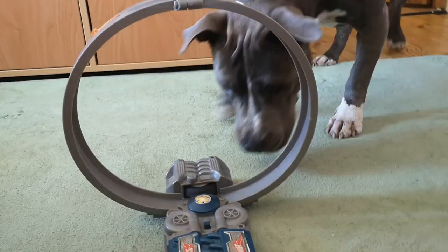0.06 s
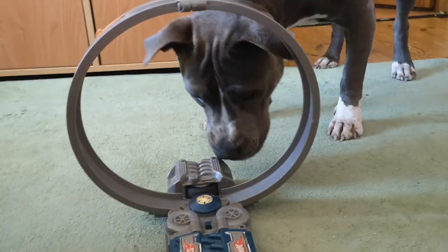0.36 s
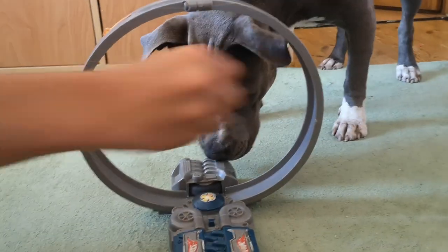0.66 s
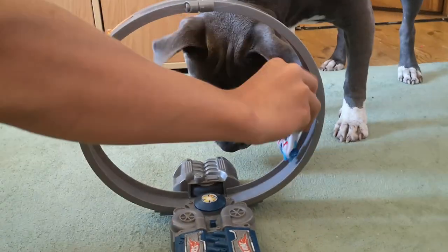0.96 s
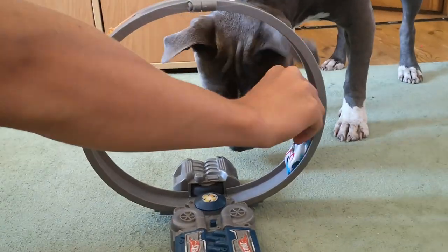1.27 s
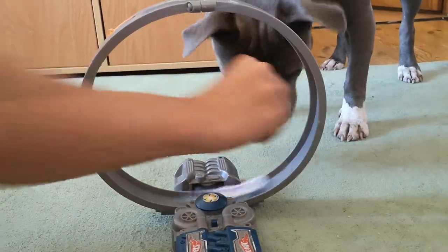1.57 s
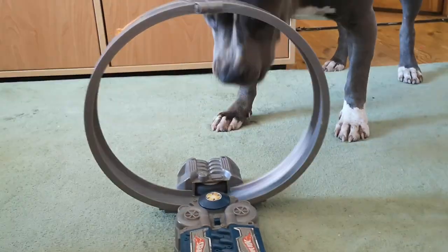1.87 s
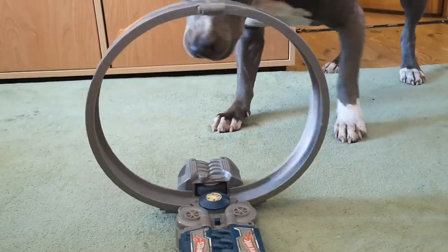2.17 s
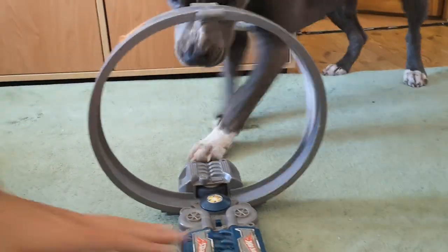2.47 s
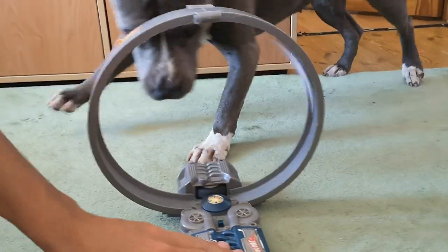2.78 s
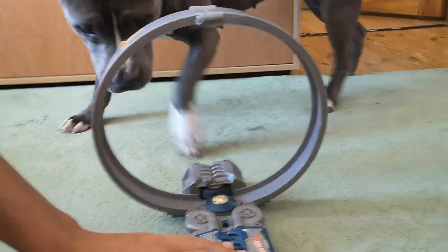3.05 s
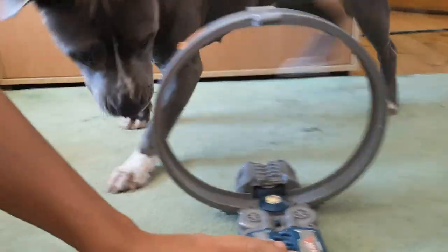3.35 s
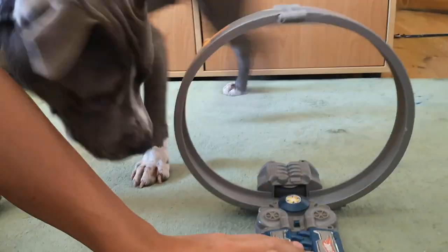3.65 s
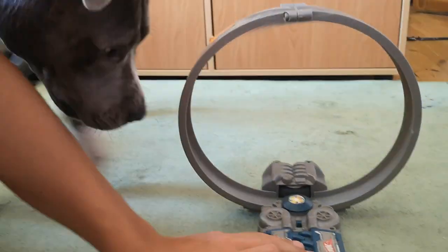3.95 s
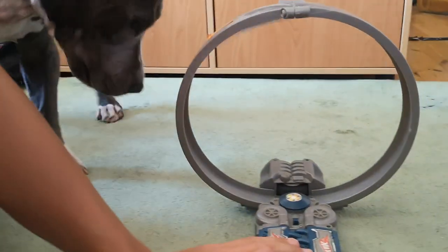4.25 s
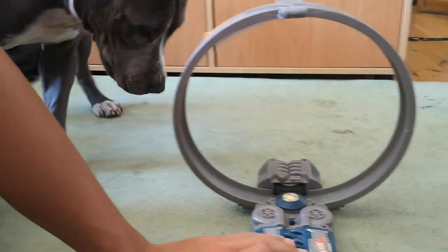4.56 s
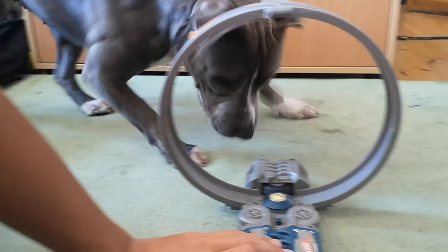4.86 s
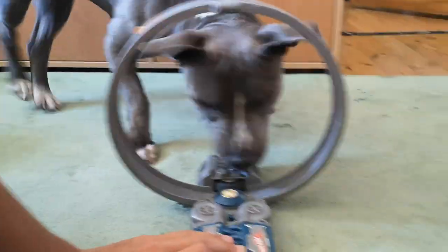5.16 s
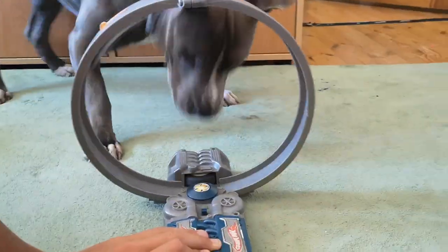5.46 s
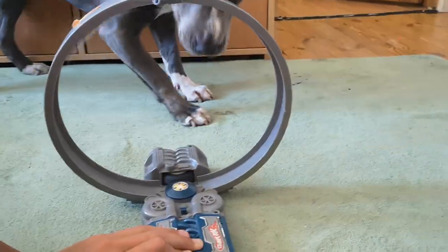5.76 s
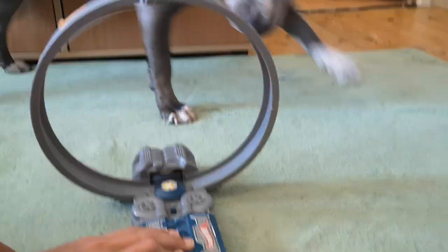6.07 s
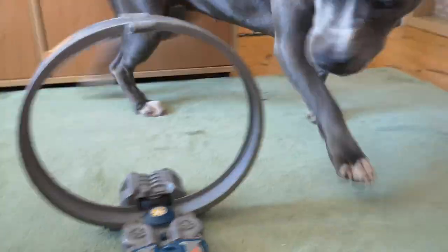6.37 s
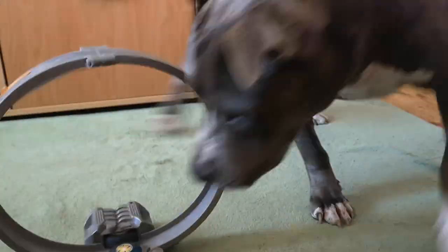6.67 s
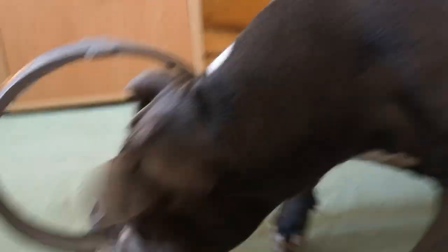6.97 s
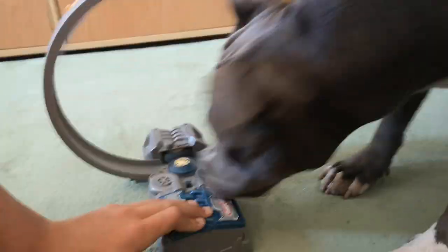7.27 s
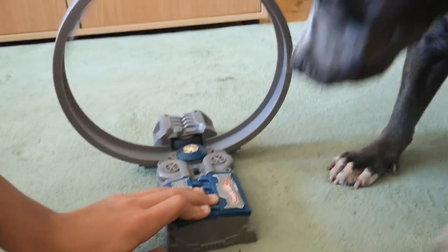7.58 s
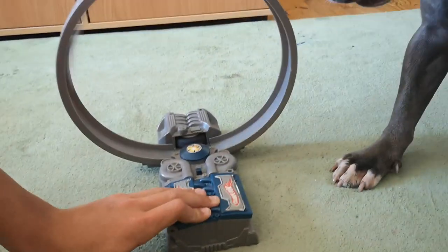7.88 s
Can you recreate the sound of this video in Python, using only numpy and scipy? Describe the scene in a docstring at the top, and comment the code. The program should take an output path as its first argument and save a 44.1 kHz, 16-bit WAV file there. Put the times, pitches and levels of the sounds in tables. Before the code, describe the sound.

Close by in a small room, the motor of a toy track booster whirrs and ticks with a thin whine. After a few plastic clicks and light rubs, a toy car starts racing round a loop in a fast, even rhythm, its wheels hissing and whirring and its body clacking through the rollers on each pass. The laps continue throughout, with dull floor thuds from the toy's base and a dog's footsteps underneath.

```python
"""A battery toy booster idles on a carpet, its motor humming and its rollers ticking.
A toy car clicks onto the plastic track and is let go. From 1.75 s on, the rollers fling it round
a loop three times a second. On every lap it clacks through the rollers and shakes the base,
then its wheels rasp up the track, go light at the top and whirr back down.
All the while, a dog pads about on the carpeted wooden floor of the small room."""
import sys
import numpy as np
from scipy import signal
from scipy.fft import rfft, irfft, next_fast_len
from scipy.io import wavfile
from scipy.ndimage import uniform_filter1d, map_coordinates

SR = 44100
rng = np.random.default_rng(int(sys.argv[2]) if len(sys.argv) > 2 else 0)


def transcribe(signal):
    """Save signal, clipped to [-1, 1], as a 16-bit WAV file at the path in sys.argv[1]."""
    frames = np.atleast_2d(signal).T
    limited = np.clip(frames, -1, 1)
    pcm = np.round(limited * 32767).astype(np.int16)
    wavfile.write(sys.argv[1], SR, pcm)


N = 349713
T = np.arange(N) / SR

# the rollers catch the car and start a lap: t/s, track ring/dB, wheel hiss/dB, clack/dB, thud/dB
LAPS = [(1.753, -26, -27.5, -4, -31.5), (2.0787, -23.5, -25.5, -9, -33), (2.3993, -24.5, -26.5, -3, -34),
        (2.7291, -24.5, -27, -6.5, -39), (3.0485, -27, -25.5, -6.5, -26.5), (3.3593, -27, -27.5, -2.5, -22),
        (3.6625, -27, -28, -7, -26), (3.978, -26.5, -27.5, -20, -26.5), (4.291, -28, -28, -6.5, -29.5),
        (4.5998, -27, -28, -5, -25), (4.9083, -28.5, -28, -9.5, -24.5), (5.215, -28.5, -26, -29, -23.5),
        (5.5252, -27, -27, -18, -24.5), (5.8232, -27.5, -27, -31, -26), (6.122, -27, -27, -14, -25.5),
        (6.4242, -29, -27, -8.5, -30), (6.7218, -28, -27, -12, -28), (7.0285, -28.5, -28, -29, -26),
        (7.3381, -30, -29.5, -20, -20.5), (7.6443, -27.5, -28.5, -4.5, -25)]
# which side the car is heard on: f/Hz, left minus right/dB
CAR_PAN = [(200, 0.5), (500, -5.5), (800, 2), (1100, 7), (1500, -11), (2100, -5.5), (2800, -0.5),
           (3400, 5.5), (4600, 1), (6400, 3), (7600, 8.5), (9000, 15), (10500, -14), (14000, 1)]
LAUNCH_S, RELEASE_S = LAPS[0][0], 1.631

def car():
    """Once let go, the car rolls quietly to the rollers, then rasps round and round the loop."""
    lap = lap_position()
    ring_db, hiss_db, *_ = curves(LAPS)
    away = distance(lap, 0.057)  # loudest just after the rollers
    # the wheels go light at the top, less so as the car gathers speed
    dip_db = 6.5 * np.exp(-((lap - 0.49) / 0.073) ** 2 - (T - LAUNCH_S) / 1.4)
    run_in_db = np.interp(T, [LAUNCH_S - .025, LAUNCH_S], [-13, 0])
    rolling_db = run_in_db + .4 * wobble(20)
    ring_db = ring_db + rolling_db - 5.5 * away - dip_db
    hiss_db = hiss_db + rolling_db - 7 * away - .5 * dip_db
    rasp, fine_rasp = (grit(rate=1000, spread_db=1.8, t60=.012) for axle in range(2))
    rolling = loop_ring(ring_db, rasp) + wheel_whirr(ring_db, lap)
    rolling += tyres(hiss_db, fine_rasp, away) + whizz(hiss_db, rasp, lap)
    swing = amp(0.36 * np.outer([1, -1], np.sin(2 * np.pi * lap)))  # left and right once a lap
    released = np.clip((T - RELEASE_S) / .01, 0, 1)
    return released * (swing * rolling + housing_rattle(rasp))


def lap_position():
    """How far round the lap the car is, from 0 to 1; the pace holds after the last catch."""
    starts = np.transpose(LAPS)[0]
    starts = np.append(starts, 2 * starts[-1] - starts[-2])
    return np.interp(T, starts, np.arange(len(starts))) % 1


def distance(lap, place):
    """How far the car is from a place on the loop: 0 right there, 1 on the opposite side."""
    return np.abs(np.sin(np.pi * (lap - place)))


# the notes the plastic loop rings at: f/Hz, width/Hz, level/dB
LOOP_NOTES = [(1280, 430, -11.5), (1490, 107, 6.5), (1863, 390, 4.5), (2500, 226, 8.5), (2780, 79, 7.5),
              (3390, 240, -0.5)]

def loop_ring(level_db, rasp):
    """The wheels make the loop ring; each of its notes swells and fades as the car moves along."""
    shaking = noise() * rasp
    ring = sum((-1) ** k * amp(2.2 * wobble(34)) * filtered(shaking, body([note]))
               for k, note in enumerate(LOOP_NOTES))
    bass_cut = lambda hz: hz ** 3 / np.hypot(hz ** 3, 400 ** 3)  # thin plastic gives little bass
    return amp(level_db - 0.5) * placed(ring, bass_cut, CAR_PAN)


def wheel_whirr(level_db, lap):
    """The wheels whirr higher as the car comes down; the whirr slowly fades over the run."""
    from_hz, to_hz = 2590, 3436
    descent = (1 + np.tanh((lap - .63) / .18)) / 2
    hz = (from_hz + (to_hz - from_hz) * descent) * (1 + .022 * wobble(28))
    fade_db = 0.5 + 0.5 * (T - LAUNCH_S) + 18 * distance(lap, 0.62) ** 2
    return amp(level_db - fade_db + 2.8 * wobble(45)) * noise_band(hz, width_hz=380)


# the tone of wheels on plastic: f/Hz, level/dB
HISS_TONE = [(1500, -16), (3000, 6), (3800, -3.5), (5100, -7.5), (6000, -0.5), (6900, 0), (7700, -1.5),
             (8500, -9.5), (10500, -18.5), (12500, -16), (15500, -33)]

def tyres(level_db, rasp, away):
    """The tyres hiss all the way round, and the rollers scrub the car as it passes through them."""
    hiss = amp(level_db) * placed(noise() * rasp, shape(HISS_TONE), CAR_PAN)
    scrub = amp(level_db - 5 - 14 * away ** 2) * rasp * noise_band(4300, width_hz=1750)
    return hiss + scrub * amp([[2], [-2]])


# how the whizz changes over the run: t/s, upper band level/dB, pitch factor
WHIZZ_CHANGES = [(2, -12.5, 1), (3.5, -10.5, 0.94), (4.4, -7.5, .94), (5.2, -13.5, .95), (6, -17, 0.93)]

def whizz(level_db, rasp, lap):
    """Two rough bands, at twice and three times a sinking pitch, fall as the car climbs; the upper one is heard
    to the right."""
    bottom_hz, sag_hz = 3758, 704
    upper_db, pitch = curves(WHIZZ_CHANGES)
    glide_hz = (bottom_hz - sag_hz * distance(lap, 0) ** 2) * pitch * (1 + .028 * wobble(25))
    lower, upper = (noise_band(k * glide_hz, width_hz=1400) for k in (2, 3))
    overtones = lower * amp([[-4.5], [-9]]) + amp(upper_db) * upper * amp([[-10], [3]])
    lap_db = 2 - 5.5 * distance(lap, 0.89) ** 2
    return amp(level_db + lap_db + 1.97 * wobble(30)) * rasp * overtones


# the notes the booster's housing rings at: f/Hz, width/Hz, level/dB
HOUSING_NOTES = [(241, 215, -10.5), (553, 53, -5), (790, 94, -0.5), (905, 91, -2), (1040, 190, -8.5),
                 (1377, 109, 1.5)]

def housing_rattle(rasp):
    """The housing shakes as the car enters, holds while the rollers grip, then drops to a faint rattle."""
    rest_db, grip_db, rise_s, hold_s, fall_db_per_s = -50.5, -30.5, 0.013, 0.013, 253
    level = np.full(N, amp(rest_db))
    for s, *_ in LAPS:
        span = slice(round(s * SR) - SR // 8, round(s * SR) + SR // 4)
        t = T[span] - s
        rise = np.exp(np.minimum(t, 0) / rise_s)
        level[span] += rise * amp(grip_db - fall_db_per_s * np.maximum(t - hold_s, 0))
    return level * placed(noise() * rasp, body(HOUSING_NOTES), CAR_PAN)


# the car is set down, let go and nudges the rollers: t/s, crack level/dB, knock above crack/dB
HANDLING = [(0.9208, -32, 3), (0.996, -34.5, -13), (1.234, -17, -8), (1.631, -20, -7), (1.636, -12.5, -9),
            (1.7389, -18.5, -14)]
# nose, front and rear wheels hit the rollers: t/s from the catch, crack/dB added to the lap's clack,
# knock/dB added to its track ring
ROLLER_HITS = [(-.015, -13.5, 7), (0, -2, 2.5), (0.0131, -10.5, 4.5)]

def strikes():
    """Every hit on the car, with stray ticks at the track's joints: t/s, crack/dB, knock/dB."""
    handling = [(s, db, db + knock_db) for s, db, knock_db in HANDLING]
    passes = [(s + lag, clack_db + crack_db, ring_db + knock_db)
              for s, ring_db, _, clack_db, _ in LAPS for lag, crack_db, knock_db in ROLLER_HITS]
    gap, softness = rng.random((80, 2)).T
    times = LAUNCH_S + np.cumsum(-np.log(gap)) / 11  # about 11 ticks a second
    joints = [(s, db, db) for s, db in zip(times, -24 - 6 * softness)]
    return handling + passes + joints


# the tone of a hit on hard plastic: f/Hz, level/dB
CRACK_TONE = [(700, -16), (2500, -10), (4500, -3.5), (5600, 2), (6900, 15), (7800, -6), (8800, 3),
              (11000, 0), (15500, -29)]
# the notes the car's shell rings at: f/Hz, width/Hz, level/dB
SHELL_NOTES = [(3390, 250, 5), (5700, 170, -1), (5600, 130, -15), (6060, 140, 0), (6840, 140, -7),
               (7700, 310, -4)]

def clacks():
    """Each hit is a crack of hard plastic that rings the car's shell and the loop."""
    times, crack_db, knock_db = np.transpose(strikes())
    # the wheels land one after another, which softens the start
    strike = lambda db, t60: uniform_filter1d(bursts(times, db, t60), size=36)
    crack = strike(crack_db - 10, t60=.02) * placed(noise(), shape(CRACK_TONE), CAR_PAN)
    shell = strike(crack_db - 12, t60=.032) * placed(noise(), body(SHELL_NOTES), CAR_PAN)
    knock = strike(knock_db - 6, t60=.03) * placed(noise(), body(LOOP_NOTES), CAR_PAN)
    return crack + shell + knock


# the louder wheel chatters: t/s, f/Hz, level/dB
LOUD_CHATTERS = [(1.82, 2743, -26), (2.151, 2804, -30), (3.294, 3460, -29.5), (3.55, 2800, -30),
                 (3.78, 2700, -28.5), (4.48, 3290, -33), (4.61, 1306, -32), (4.736, 2640, -33),
                 (4.95, 1465, -30.5), (5.14, 3450, -31.5), (7.651, 1523, -29.5)]

def wheel_chatter():
    """A wheel chatters on its axle in short rough notes; the faint ones use the loop's upper notes."""
    faint_per_s, faint_db, length_s = 4, -34.5, 0.1
    delay, picks = rng.random((32, 2)).T
    times = LAUNCH_S + (np.arange(len(delay)) + 1 + delay) / faint_per_s
    faint = [(s, LOOP_NOTES[-1 - int(pick * len(LOOP_NOTES) / 2)][0], faint_db)
             for s, pick in zip(times, picks) if s < T[-1]]

    def notes(rows):
        s, hz, _ = np.transpose(rows)
        nearest = np.searchsorted((s[1:] + s[:-1]) / 2, T)
        level = sum(amp(db) * swell(at - length_s / 2, length_s) for at, _, db in rows)
        return level * noise_band(hz[nearest], width_hz=170)
    return notes(LOUD_CHATTERS) + notes(faint)


# the motor's tones: multiple of the shaft speed, level/dB
MOTOR_TONES = [(1, 1.5), (2, -25.5), (9, -3.5), (11, -4), (15.2, -8)]
# the tone of the gears and of a roller tick: f/Hz, level/dB
GEAR_TONE = [(200, -20), (400, -12), (620, -7.5), (1000, -8.5), (1300, -4), (1750, -6), (2130, 0.5),
             (2400, -10.5), (2800, -3.5), (3150, -19.5), (7000, -18.5), (8400, -23.5), (9300, -48),
             (9900, -29), (13000, -33.5), (13750, -28), (15000, -45)]
TICK_TONE = [(800, 0), (2200, 15.5), (3300, 0), (5250, 8.5), (5900, 5), (6650, 5), (8000, -5), (12000, -11),
             (15500, -28)]
# the rollers' ticking grows louder around one second in and stays loud: t/s, level/dB
TICK_LEVELS = [(.7, -56), (1.2, -47.5), (1.6, -49)]
# which side the booster is heard on: f/Hz, left minus right/dB
BOOSTER_PAN = [(60, -2), (110, -5), (200, 4), (380, -3), (700, 5), (1290, -3.5), (2380, -6), (4400, 10),
               (8120, 7), (15000, -47)]

def booster():
    """The motor hums, its gears whirr, and two rollers tick in turn, one harder than the other."""
    shaft_hz, hum_db, gear_db, ticks_per_s = 138, -57.5, -44, 66
    turns = np.cumsum(shaft_hz * (1 + 0.00375 * wobble(7.2))) / SR
    hum = sum(amp(hum_db + db + 1.7 * wobble(17)) * np.sqrt(2) * np.sin(2 * np.pi * k * turns)
              for k, db in MOTOR_TONES)
    gears = placed(noise() * grit(rate=440, spread_db=1.5, t60=0.041), shape(GEAR_TONE), BOOSTER_PAN)
    timing, force = rng.standard_normal((600, 2)).T
    beat = np.arange(len(timing))
    pulses = bursts(beat / ticks_per_s + .0014 * timing, 1.4 * force - 5 * (beat % 2), t60=.028)
    ticks = placed(noise() * uniform_filter1d(pulses, size=100), shape(TICK_TONE), BOOSTER_PAN)
    tick_db, = curves(TICK_LEVELS)
    return hum + amp(gear_db) * gears + amp(tick_db + 2) * ticks


# the pitches of the gear whine: f/Hz, width/Hz, level/dB
WHINE_BANDS = [(2150, 280, -48.5), (6720, 110, -61), (9150, 430, -61.5), (13760, 340, -69)]

def gear_whine():
    """The gears give a thin, wavering whine that grows during the first second."""
    level_db = np.interp(T, [.3, .8], [-6, 0]) + 2 * wobble(3)
    return amp(level_db) * sum(amp(db) * noise_band(hz, width) for hz, width, db in WHINE_BANDS)


# the notes the floor boards ring at: f/Hz, level/dB, fade time/s
BOARD_NOTES = [(67, -7, 0.39), (82.4, 5, 0.14), (102, -14, 0.54), (137.3, 1, 0.37), (182, 1, 0.16),
               (227, -5.5, 0.16), (264, -13, 0.27)]
# paws and bumps on the floor: t/s, level/dB, boost of the notes above 120 Hz/dB
PAW_STEPS = [(0.004, -29.5, -15), (0.316, -39, 17), (2.643, -33.5, -19), (2.987, -25, 11), (3.15, -28, -6),
             (3.392, -25, -12), (3.447, -29.5, -1), (3.766, -28.5, 1), (4.099, -37, 14), (4.186, -35, 7),
             (4.883, -24.5, -17), (5.373, -27.5, -3), (5.433, -22, -7), (5.594, -27, -4), (6.27, -21.5, -2),
             (6.954, -20.5, -10), (7.059, -20.5, -10), (7.186, -18.5, -13.5), (7.249, -23.5, -2),
             (7.383, -22.5, -3)]

def floor_thuds():
    """The booster's base and the dog's paws thump the boards; some thuds are dull, others brighter."""
    out, t = np.zeros(N + SR), np.arange(SR // 3) / SR
    hz, note_db, t60 = np.transpose(BOARD_NOTES)[:, :, None]
    base_hits = [(s + 0.0035, db, -6) for s, *_, db in LAPS]  # soft, just after each catch
    soft_start = (1 - np.exp(-t / 0.003)) ** 2
    for s, db, boost_db in base_hits + PAW_STEPS:
        size, detune, phase = rng.standard_normal((3, len(BOARD_NOTES), 1))
        level_db = note_db + 2 * size + (hz > 120) * boost_db - 60 * t / t60
        notes = np.sin(2 * np.pi * hz * (1 + 0.024 * detune) * t + phase)
        ring = np.sum(amp(level_db) * notes, 0) * soft_start
        out[round(s * SR):][:len(t)] += amp(db + 3.5) * ring / np.abs(ring).max()
    # the boards give little sound below their lowest note
    return signal.sosfilt(signal.butter(3, 48, 'high', fs=SR, output='sos'), out[:N])


# rubs by the track: t/s, length/s, f/Hz, width/Hz, level/dB
RUBS = [(0.846, 0.14, 1330, 1300, -42), (1.238, .054, 8100, 6100, -47), (1.26, 0.2, 1110, 1510, -39),
        (5.346, 0.04, 680, 1100, -33.5), (7.245, 0.15, 1020, 256, -32.5), (7.283, 0.13, 378, 398, -35),
        (7.76, 0.11, 478, 261, -36)]

def scuffs():
    """Something brushes by the track in brief, grainy rubs that swell and fade."""
    rub = lambda hz, width: unit(filtered(rng.standard_normal(N), lambda f: body([(hz, width, 0)])(f) ** 2))
    grain = grit(rate=260, spread_db=2.3, t60=.07)
    return grain * sum(amp(db) * swell(s, length) * rub(hz, width) for s, length, hz, width, db in RUBS)


# the tone of the rumble: f/Hz, level/dB
RUMBLE_TONE = [(15, -4), (36, 0), (55, 2), (90, 3), (170, -5.5), (300, -10.5), (800, -30.5)]

def rumble():
    """A low, uneven rumble slowly grows."""
    level_db = -50.5 + 0.84 * T + 1.6 * wobble(9)
    return amp(level_db) * unit(filtered(noise(), shape(RUMBLE_TONE)))


# how long the room rings: f/Hz, fade time/s
ROOM_FADE = [(200, 0.066), (2000, 0.21), (10000, 0.5)]

def room_echo(x):
    """The small room answers with short echoes that change as the sources move."""
    out, size = np.zeros((2, N + 2 * SR)), SR // 4
    for start in range(0, N, size):
        hz, t, spectrum = signal.stft(rng.standard_normal((2, SR // 3)), SR, nperseg=256)
        tail = signal.istft(spectrum * amp(-60 * t / along(ROOM_FADE, hz)[:, None]), SR, nperseg=256)[1]
        echo = signal.fftconvolve(x[:, start:start + size], tail / np.linalg.norm(tail[0]), axes=1)
        out[:, start:start + echo.shape[1]] += echo
    return out[:, :N]


# how alike left and right are: f/Hz, likeness (1 is the same, -1 is opposite)
LIKENESS = [(100, 1), (280, 0.84), (600, -0.61), (800, -0.11), (1100, 0.37), (1500, 0.8), (2300, -0.11),
            (4000, -0.18)]

def noise():
    """White noise for left and right, alike in the bass."""
    turn = lambda hz: np.arccos(np.clip(along(LIKENESS, hz), -1, 1)) / 2
    shares = lambda hz: np.array([np.cos(turn(hz)), np.sin(turn(hz))])
    mid, side = filtered(rng.standard_normal((2, N)), shares)
    return np.array([mid + side, mid - side])


def noise_band(centre_hz, width_hz):
    """Stereo noise around one pitch, which may move."""
    slow = filtered(rng.standard_normal((2, 2, N)), lambda hz: 1 / (1 + (hz / width_hz) ** 2) ** 2)
    phase = 2 * np.pi * np.cumsum(centre_hz * np.ones(N)) / SR
    return unit(slow[0] * np.cos(phase) + slow[1] * np.sin(phase))


def bursts(times, db, t60):
    """A level that jumps at each time, then falls 60 dB in the fade time of t60 seconds."""
    power = np.bincount(np.clip(np.round(times * SR).astype(int), 0, N), amp(db) ** 2, N + 1)[:N]
    return np.sqrt(signal.lfilter([1], [1, -amp(-120 / (t60 * SR))], power))


def grit(rate, spread_db, t60):
    """The rough level of many tiny, uneven hits, about rate of them a second."""
    gap, size = rng.random((12000, 2)).T
    times = np.cumsum(-np.log(gap)) / rate
    return unit(bursts(times, -spread_db * np.log(size + .01), t60))


def swell(s, length):
    """One smooth rise and fall from time s."""
    out, size = np.zeros(N + SR), round(length * SR)
    out[round(s * SR):][:size] = np.sin(np.linspace(0, np.pi, size))
    return out[:N]


def wobble(rate):
    """A smooth curve through rate random values a second."""
    return map_coordinates(rng.standard_normal(int(N * rate / SR) + 4), [T * rate])


def placed(x, response, pan):
    """Filter x, share each frequency between left and right, and scale to strength 1."""
    def gains(hz):
        pair = amp(np.outer([.5, -.5], along(pan, hz)))
        return response(hz) * pair / np.linalg.norm(pair, axis=0)
    return unit(filtered(x, gains))


def filtered(x, response):
    """Turn each frequency of x up or down by response(hz)."""
    size = next_fast_len(x.shape[-1] + 8192)
    return irfft(rfft(x, size) * response(np.fft.rfftfreq(size, 1 / SR)), size)[..., :x.shape[-1]]


def shape(tone):
    """A filter that follows a tone table."""
    return lambda hz: amp(along(tone, hz))


def body(notes):
    """A filter that rings at an object's own notes."""
    return lambda f: sum((-1) ** k * amp(db) * 1j * f * width / (hz * hz - f * f + 1j * f * width)
                         for k, (hz, width, db) in enumerate(notes))


def along(points, hz):
    """Read between the rows of a frequency table, on a log scale."""
    f, values = np.transpose(points)
    return np.interp(np.log(hz + 1), np.log(f + 1), values)


def curves(rows):
    """Turn a time table into one curve for each column after the first."""
    times, *columns = np.transpose(rows)
    return [np.interp(T, times, column) for column in columns]


def amp(db):
    """Decibels to gain."""
    return 10 ** (np.asarray(db) / 20)


def unit(x):
    """Scale so that the average of the channels has strength (rms) 1."""
    return x / np.sqrt(np.mean(np.atleast_2d(x).mean(0) ** 2) + 1e-20)


def scene():
    """The toy and its echo, over a low rumble and thuds on the floor."""
    toy = gear_whine() + booster() + car() + wheel_chatter() + clacks() + scuffs()
    return toy + rumble() + amp(-10) * room_echo(toy) + floor_thuds()


def record(dry):
    """Round off the highest peaks and cut the very top of the treble."""
    ceiling, top_hz = .9, 15400
    rounded = dry / (1 + np.abs(dry / ceiling) ** 6) ** (1 / 6)
    return filtered(rounded, lambda hz: hz < top_hz)


dry = scene()
out = record(dry)
transcribe(out)
```